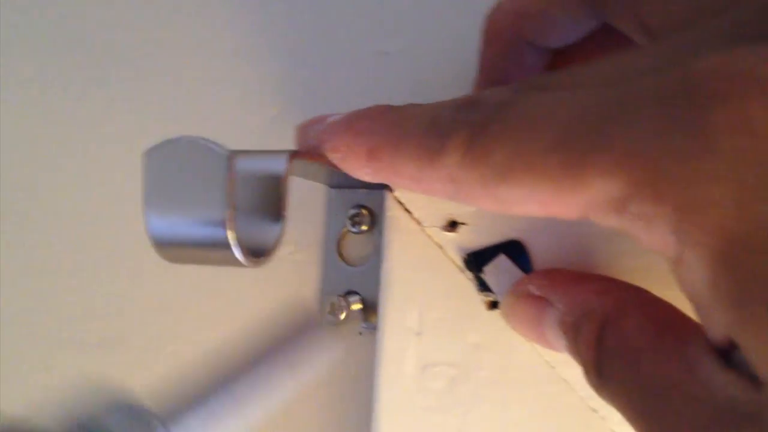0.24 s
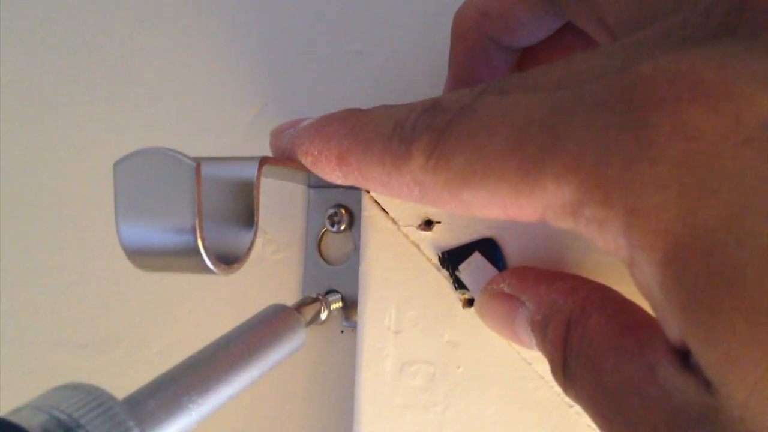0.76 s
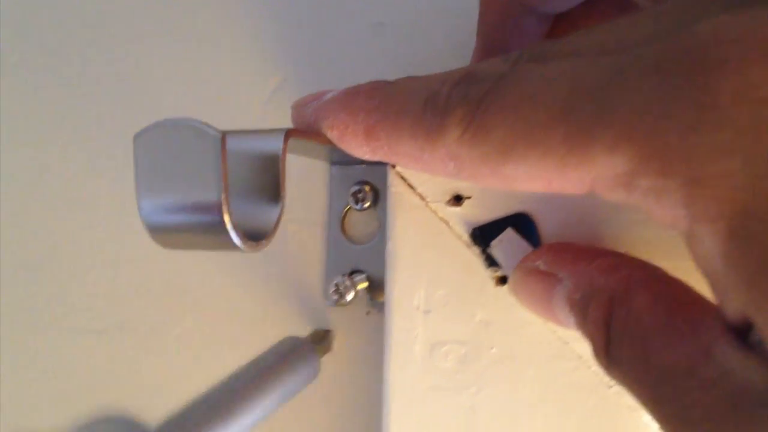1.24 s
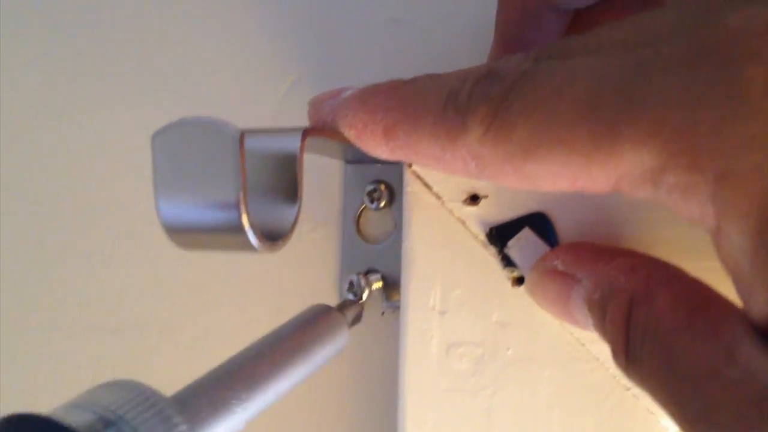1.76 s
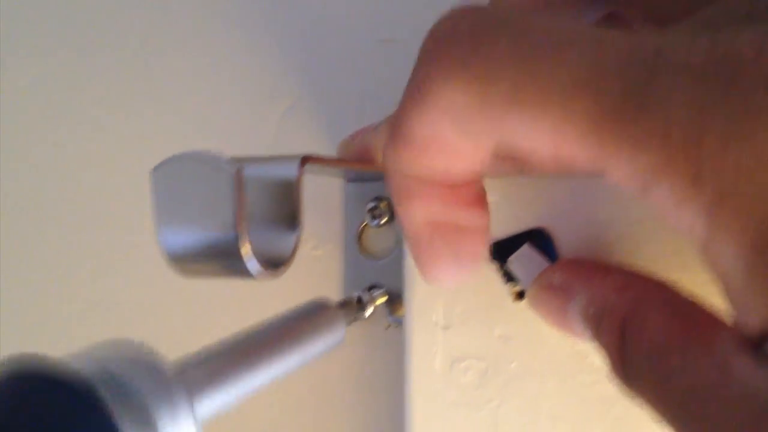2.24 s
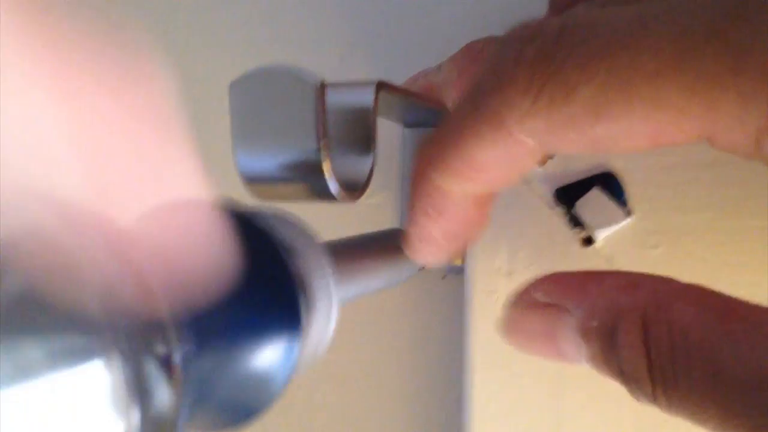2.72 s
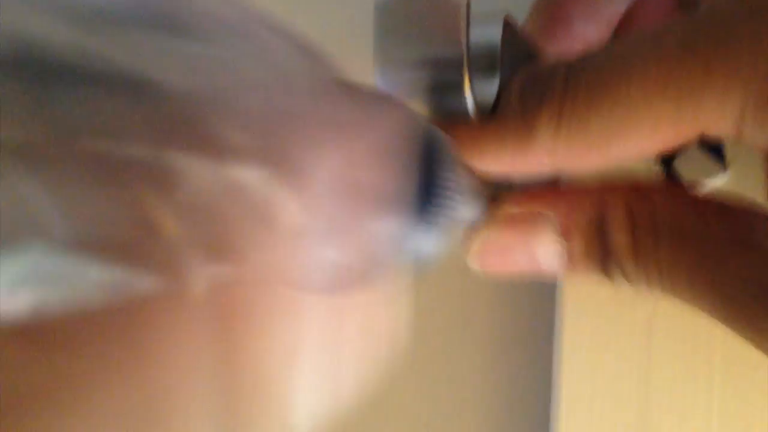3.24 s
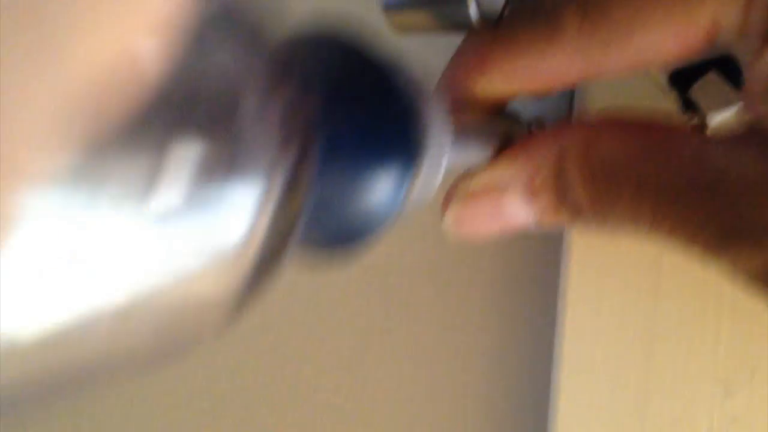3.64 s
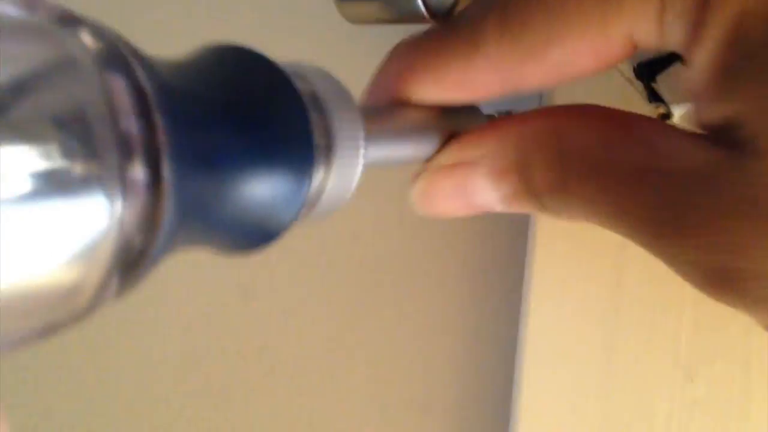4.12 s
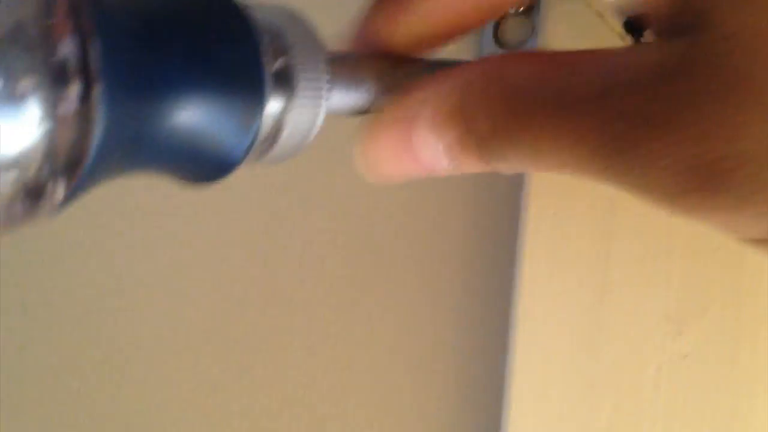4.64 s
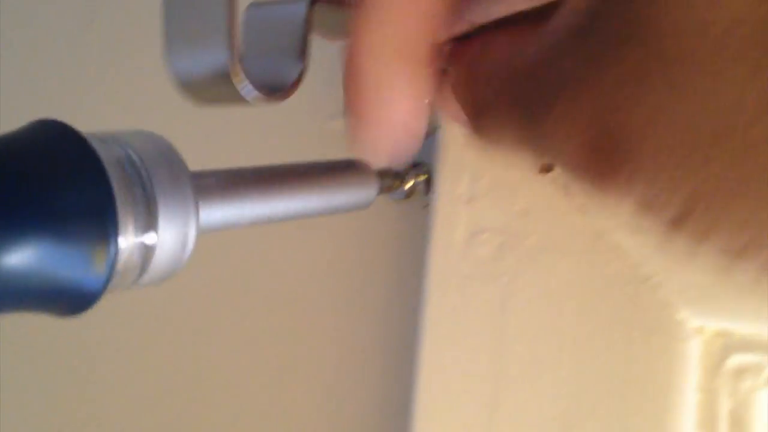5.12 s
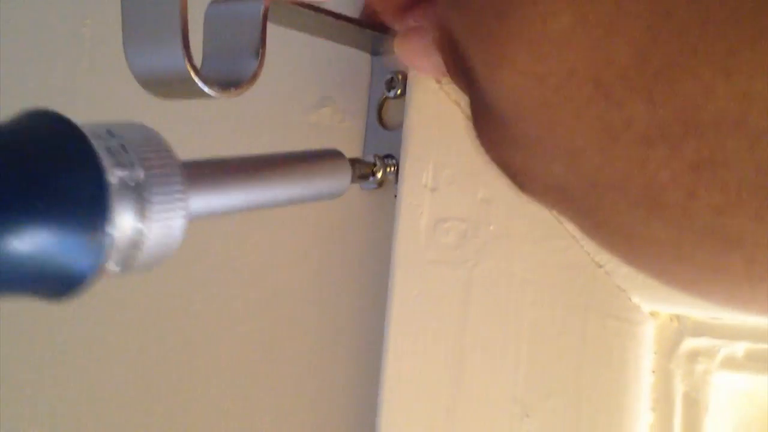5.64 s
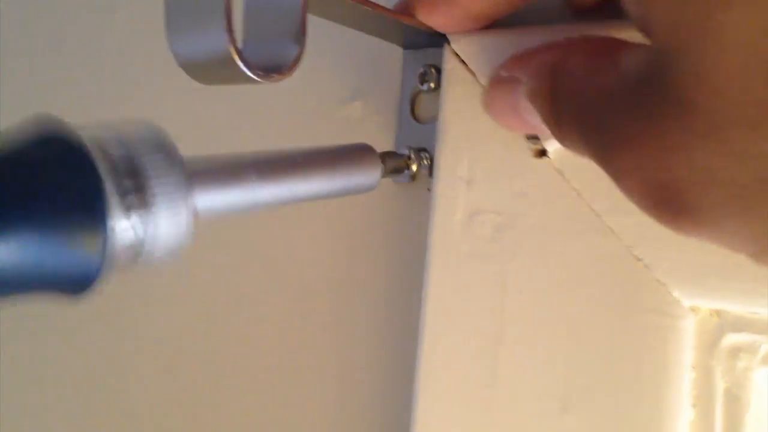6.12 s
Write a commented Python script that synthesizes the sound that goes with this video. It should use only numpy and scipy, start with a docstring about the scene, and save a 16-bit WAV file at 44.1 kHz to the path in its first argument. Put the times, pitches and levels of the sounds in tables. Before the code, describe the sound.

Close-up fumbling metal taps and a few sharp knocks give way to repeated crisp ratchet clicking in a small bare room.

```python
"""In a small bare room, a ratchet screwdriver drives a screw into a metal bracket on a wooden door frame, heard close up.
First the bit fumbles, taps and drags; later the pawl clicks over the ratchet teeth as the handle turns back.
Clicks, taps and knocks are short noisy blows that ring the tool, bracket or wood; drags and rubbing hands are lumpy
noise. The room answers with fading noise tails, over a faint hiss."""
import sys
import numpy as np
from scipy import signal
from scipy.fft import rfft, irfft, next_fast_len
from scipy.io import wavfile
from scipy.ndimage import map_coordinates

SR = 44100
rng = np.random.default_rng(int(sys.argv[2]) if len(sys.argv) > 2 else 0)


def unload_audio(sound):
    """Save the sound as a 16-bit wav file, at the path given as the first command line argument."""
    columns = np.transpose(np.atleast_2d(sound))
    # keep every value between -1 and 1, then stretch to whole-number steps
    steps = np.round(np.clip(columns, -1, 1) * 32767)
    wavfile.write(sys.argv[1], SR, steps.astype(np.int16))


N = 281358  # length in samples

# Hands sliding on wood and tool. Each row: time in seconds, rumble level in dB, rustle level in dB.
HAND_RUBS = [(0.0, -67.5, -72), (1.05, -73.5, -75), (1.22, -60, -62.5), (1.42, -77, -69),
             (1.78, -75.5, -97), (2.15, -63, -63), (2.42, -63, -65.5), (3.0, -61.5, -67.5),
             (3.16, -62, -62), (3.36, -67, -66), (4.42, -64, -65.5), (4.62, -63.5, -69), (5.26, -68, -67),
             (5.49, -57.5, -66.5), (5.86, -67, -61), (6.06, -60, -68), (6.2, -62, -57.5), (6.38, -67, -71)]
# Pushes into the frame. Each row: start in seconds, level of the middle modes in dB,
# low boom over them in dB, upper modes over them in dB.
FRAME_PUSHES = [(0.002, -45, 0, -22), (0.357, -52, -17, -0.5), (0.669, -41.5, -0.5, -10),
                (1.004, -48.0, -2, -8.5), (1.107, -47.5, -1.5, -5), (1.16, -55, -7, 7),
                (1.212, -20.5, -1.5, -5.5), (1.236, -31.0, 7, -7), (1.325, -50.5, 7, 7),
                (1.81, -50.5, -5, -7), (1.829, -49.5, 5.5, -6.0), (2.014, -42, 4, -5.5),
                (2.036, -46, 8.5, -15), (2.214, -49, 1, 4), (2.255, -34.5, -8, 2), (2.281, -41, 5.5, -14),
                (2.443, -49, -4, 3.0), (2.563, -29.5, 1, 2), (2.681, -43.5, 0.5, 5.5),
                (2.721, -48, -11, 11), (2.863, -46, -3, -0.5), (2.918, -37.5, -5, 1), (2.933, -41.5, 4, -5),
                (3.138, -39.5, 5.5, 10), (3.944, -50.5, 6.5, 4.5), (4.058, -48.5, 1, -1),
                (4.268, -52, 8, 4.5), (4.361, -47.5, 2.5, -1), (4.739, -61, 21, -2),
                (4.756, -57.5, 19, -6.5), (4.857, -36, -12, -6), (5.0, -41.5, 6, -6),
                (5.241, -33.5, -19, -10), (5.253, -33, -12.5, -2), (5.472, -36.0, -6.5, -5),
                (5.509, -41.0, -19, -10), (5.629, -20.5, -10, -13), (5.76, -40.5, -13, -3.5),
                (5.782, -47, 4, 1), (5.966, -27.5, -7.5, -26), (6.109, -29.5, -14, -6),
                (6.122, -25.5, -11, -11), (6.143, -30.5, -5.5, -5), (6.31, -28.0, -15, -6)]
# The bit touching screw and bracket. Each row: start in seconds, level of the lowest ring in dB,
# second ring over it in dB, treble over it in dB.
BIT_TAPS = [(0.2134, -43, -8.5, -3.5), (0.6703, -41, -6, 1), (0.719, -48, 0, -5),
            (1.0059, -43.5, -2.5, 3.5), (1.092, -45, -3, -8), (1.109, -48, 0.5, -13), (1.117, -54, 8, -4.5),
            (1.1515, -43, -10.5, -8), (1.1586, -43.5, -10.5, 5.5), (1.1703, -36, 7.5, -16.5),
            (1.213, -14, -3.5, -2), (1.2495, -19.5, -5.5, -3.5), (1.2788, -27.5, 4.5, 12),
            (1.29, -32.5, 0, 0), (1.3232, -40.5, -3, -4), (1.687, -44, -1, 6.5), (1.729, -49, -3, -10),
            (1.796, -46.5, -7, -1), (1.806, -44.5, -4.5, 3), (1.829, -46.5, -7, -2), (1.8532, -51.5, 0, -6),
            (2.0103, -43, -5, -13), (2.1243, -52, -14, -11), (2.1823, -57, 7, 10), (2.2009, -44, 4, 3),
            (2.214, -47, 1.5, 5.5), (2.257, -19.5, -7, -9), (2.421, -56, 6.5, -10.5),
            (2.4456, -45, -23, -18), (2.5445, -42, 5, -1.5), (2.563, -9, -3.5, -1), (2.681, -54, 7, 2),
            (2.701, -49, 12, -16), (2.7077, -44, 8, -12), (2.714, -48, -2.5, 0.5), (2.723, -30, 1.5, -19),
            (2.745, -48, 2, 1.5), (2.8616, -53.0, 1, -4), (2.8882, -34.5, -8, -14),
            (2.919, -43.5, -1, -7.5), (2.9898, -60.5, 20.5, 20), (3.0525, -46, -4, -5),
            (3.1389, -35, -14.5, -23), (3.72, -45, 1.5, -7), (4.269, -49.5, -14, -11.5),
            (4.789, -64, 6.0, 13.5), (4.8573, -41.5, -12, -25), (4.877, -44, -11, -5),
            (4.9317, -56, -2, -2), (4.9783, -40, 10.5, 8.5), (4.996, -39, -5, -5), (5.005, -46, -3, 5),
            (5.075, -63, 5.5, 6), (5.2436, -50.5, 0, -12), (5.4395, -39.5, -10, 2),
            (5.4688, -34.5, -13.5, -29), (5.514, -46, -4, -5.5), (5.979, -38, -4, -2),
            (6.1002, -41, -8.0, 1), (6.1105, -24, -12.0, -12), (6.122, -30, -6, -12),
            (6.1303, -29.5, -15.5, -9), (6.142, -30.5, -2, -10), (6.314, -37, -3.0, -0.5)]
# The bit dragging over metal and wood. Each row: start in seconds, length in seconds, level in dB.
BIT_DRAGS = [(.54, 0.14, -68), (1.069, .11, -57.5), (1.79, 0.088, -65), (2.162, 0.14, -61.5),
             (2.412, 0.069, -59), (2.516, 0.042, -52), (2.67, .09, -58), (2.847, 0.13, -55),
             (2.96, 0.14, -55), (3.775, 0.045, -57), (4.353, .03, -53.5), (5.382, 0.2, -56),
             (5.968, 0.057, -46), (6.064, 0.077, -45), (6.308, 0.042, -41.5)]
# Each tooth the pawl drops from. Each row: start in seconds, level of the lowest ring in dB,
# second ring over it in dB, treble over it in dB.
TOOTH_DROPS = [(3.17, -37, 8, 1.5), (3.1797, -22, 14.5, 8), (3.195, -21, 4, 7), (3.2183, -30.5, 3.5, 6.5),
               (3.2229, -25, 6.5, 9), (3.2787, -26, 3.5, 10), (3.2922, -24, -8, 7), (3.307, -25, 9.5, 13.0),
               (3.3311, -23.5, 0, 9.0), (3.5369, -17, 1.5, 3), (3.5528, -17.5, -0.5, 6),
               (3.565, -18, 1.5, 6.5), (3.5756, -15.5, 0, 3), (3.5872, -23.5, 5, 10.5),
               (3.8001, -18.5, 2, 0.5), (3.8117, -15, -10.5, 3.5), (3.825, -17, -1.5, 7),
               (3.8337, -16, -5.5, 1), (3.8439, -13.5, -1, 0.5), (3.8515, -19, 7, 7), (3.8624, -18, 5, 6),
               (4.0802, -15.5, 1.5, 1), (4.0976, -15.0, -3, 5.0), (4.1112, -18.5, 0.0, 2.5),
               (4.1335, -25.5, 6.5, 12.5), (4.3837, -24.5, 3.5, 10.5), (4.4025, -21, 3, 7.5),
               (4.428, -20.5, 0.5, 9.5), (4.4517, -21, -1.5, 10.5), (4.4657, -19.5, 2.5, 3.5),
               (4.4756, -18.5, -4.5, 8.5), (4.489, -21, 0.5, 6.5), (4.4977, -28, -9.5, -6.5),
               (4.514, -22, -3, 8), (5.2553, -32.5, 5.5, 6), (5.268, -24.5, 3.5, 13.5),
               (5.2793, -25.5, 2.5, 13.5), (5.2894, -25.5, 5, 13), (5.299, -31.5, 13.5, 16),
               (5.3081, -26, 3, 11.5), (5.3193, -22.0, -2, 3.5), (5.3361, -21.5, -12.5, 2.0),
               (5.3569, -30.5, 2, -4), (5.3697, -21, -7.0, 3.5), (5.6378, -39.5, -3, 4),
               (5.6502, -26.5, 0, 13.5), (5.6598, -23.5, 0.5, 14.5), (5.669, -24.5, 1, 13.5),
               (5.678, -20.5, 3.5, 11.5), (5.6881, -20.5, 3, 6.5), (5.7029, -27.5, -3, 12),
               (5.9941, -25.5, 0, 8.5), (6.005, -24, -8, 11.5), (6.0146, -23.0, 2.5, 11),
               (6.0249, -22, 1.5, 7), (6.035, -21.5, -7, 11.5), (6.05, -26.5, 5.5, 9.5),
               (6.3338, -23.5, 3, 11.5), (6.342, -21, -6, -3.5), (6.3522, -22.5, -4, 11),
               (6.3616, -20, -9, 9.5), (6.3681, -22.0, -3, 2.5), (6.3775, -28, -6, 3)]

# Ways the wood, bracket and driver ring, in groups from low to high.
# Each row in a group: pitch in Hz, width in Hz, level against the rest of its group in dB.
FRAME_MODES = [
    [(147.4, 23, -5), (192.3, 12, 3), (237, 15, -4)],
    [(330.5, 50, -1), (449, 47, -0.051), (549.5, 71, 0.74)],
    [(759, 120, -1.5), (976, 320, -3.5), (1194, 260, -5.5)],
]
BRACKET_MODES = [
    [(1500, 1300, -7.5), (1930, 400, 1.5), (2680, 684, 4.5), (3316, 500, 3)],
    [(4200, 680, 0)],
    [(6080, 410, 0.021), (8840, 720, 0.011)],
    [(11750, 2200, 0.016), (13500, 530, 0.017)],
]
DRIVER_MODES = [
    [(1868, 2400, -7), (2867, 770, 8)],
    [(4460, 1050, 0)],
    [(6580, 1110, -3), (7640, 1200, -1.5), (9020, 1930, -3.5)],
    [(12240, 1400, 8.5), (15150, 860, 14)],
]
# How the treble divides between the two upper mode groups: one dB offset for each group.
TAP_TREBLE_DB = [-4, -8]
PAWL_TREBLE_DB = [-2, -2]

# Noise colours: rumble and rustle of the hands, then quiet room and microphone hiss.
# Each row: frequency in Hz, relative strength in dB per Hz.
RUMBLE_COLOUR = [(24, -45.5), (40, -25), (157, -11), (212, -7.5), (439, -11.5), (543, -13), (692, -14.5),
                 (1500, -23.5), (1950, -52), (3300, -120)]
RUSTLE_COLOUR = [(700, -36), (1500, 0.5), (2800, 0), (4400, -1.5), (8000, -5.5), (15000, -8.5)]
AIR_COLOUR = [(18, -58.5), (30, -23), (177, -6.5), (808, -12), (1020, -8.5), (1170, -17), (1470, -9),
              (6210, -14), (6890, -12), (9680, -18.5), (15500, -12)]
# How long the room rings. Each row: frequency in Hz, seconds to fall by 60 dB.
ROOM_DECAY = [(150, 0.37), (700, 0.31), (2000, 0.21), (5000, 0.27), (13000, 0.23)]
# What the microphone passes. Each row: frequency in Hz, gain in dB.
MICROPHONE_GAIN = [(30, -12.5), (100, -0.5), (200, -0.5), (15000, -5), (15500, -28), (16400, -33)]

AIR_DB = -68.5
TOP_HZ = 16520  # nothing is kept from here up
REBOUND_S, REBOUND_DB = 0.006, -13  # delay and level of a tap's rebound
FIDGETS_PER_S, FIDGET_DB = 10, -2  # faint chance contacts; lowest level over the rustle of the hands
SCATTER_DB = 2  # no two contacts divide their treble alike
SCRAPE_EDGE = 0.52  # under 1, a drag starts and stops more abruptly than a sine arch
# The pawl scrapes the crest of the tooth before it drops: typical head start, level and length.
LEAD_S, LEAD_DB, LEAD_MS = 0.0044, -10, 6.3
LEAD_FADES = 0.43  # dB of scrape lost per dB of treble: crisp drops come clean off the tooth
# Chatter length of a drop with 0 dB of treble, and how far it shrinks (as dB) per dB of treble.
CHATTER_MS, CRISPER_DB = 2.88, -0.05


def amp(db):
    """Turn dB into a gain."""
    return 10 ** (np.asarray(db) / 20)


def unit(x):
    """Scale a sound to an average (rms) strength of 1."""
    return x / np.sqrt(np.mean(x ** 2) + 1e-20)


def along(points, hz):
    """Read a curve of (Hz, value) points, joined by lines on a log frequency axis."""
    f, v = np.transpose(points)
    return np.interp(np.log(hz + 1), np.log(f + 1), v)


def filtered(x, response):
    """Change the strength of each frequency in x by the given response."""
    padded = next_fast_len(N + SR // 2)
    spectrum = rfft(x, padded) * response(np.fft.rfftfreq(padded, 1 / SR))
    return irfft(spectrum, padded)[..., :N]


def noise(colour):
    """Make steady noise of the given colour, with rms 1."""
    return unit(filtered(rng.standard_normal(N), lambda hz: amp(along(colour, hz))))


def wobble(rate):
    """Draw a smooth random curve through `rate` chance points a second."""
    points = rng.standard_normal(int(N * rate / SR) + 4)
    return map_coordinates(points, [np.arange(N) * rate / SR])


def grouped(db, second_db, treble_db, split_db):
    """Give a level to each of four mode groups; chance tips the treble one way or the other."""
    tip_db = SCATTER_DB * rng.standard_normal(len(db))
    third_db = db + treble_db + split_db[0] + tip_db
    fourth_db = db + treble_db + split_db[1] - tip_db
    return [db, db + second_db, third_db, fourth_db]


def struck(times, levels_db, lasting_ms, body, rise_ms, linger_db, size):
    """Ring a body with chatters of tiny impacts that stop short and linger faintly.

    Levels count energy over 1 ms, per mode group. Two rows come back: the sound heard directly,
    and its mean over all directions, sent to the walls."""
    ms = np.arange(size) * 1000 / SR
    f = np.fft.rfftfreq(2 * size, 1 / SR)
    age = ms / lasting_ms[:, None]
    shape = (1 - np.exp(-ms / rise_ms)) * (np.exp(-age ** 2) + amp(linger_db) * np.exp(-age / 2.5))
    direct = spread = 0
    for db, modes in zip(levels_db, body):
        response = 0
        for k, (centre, width, gain_db) in enumerate(modes):
            mode = 1j * f * width / (centre ** 2 - f ** 2 + 1j * f * width)
            response = response + (-1) ** k * amp(gain_db) * mode  # neighbours have opposite signs
        chatter = shape * rng.standard_normal(shape.shape)
        ring = irfft(rfft(chatter, 2 * size) * response)[:, :size]
        clean = irfft(response)[:size]  # the ring of one single impact
        strength = amp(db)[:, None] * np.sqrt(SR / 1000)
        sign = rng.choice([-1, 1], (len(times), 1))
        direct = direct + strength * ring / np.linalg.norm(ring, axis=1, keepdims=True)
        spread = spread + strength * clean / np.linalg.norm(clean) * sign
    at = np.round(times * SR).astype(int)[:, None] + np.arange(size)
    return np.array([np.bincount(at.ravel(), blows.ravel(), N)[:N] for blows in (direct, spread)])


def hands():
    """Skin sticks and slips, so the rub comes in lumps and grains."""
    s, rumble_db, rustle_db = np.transpose(HAND_RUBS)
    t = np.arange(N) / SR
    lumps = amp(2.9 * wobble(25))
    rumble = amp(np.interp(t, s, rumble_db)) * unit(lumps * noise(RUMBLE_COLOUR))
    grains = amp(0.98 * wobble(25) + 3.8 * wobble(300))
    rustle = amp(np.interp(t, s, rustle_db)) * unit(grains * noise(RUSTLE_COLOUR))
    return rumble + rustle


def air():
    """Quiet room and microphone hiss are one steady coloured noise."""
    return amp(AIR_DB) * noise(AIR_COLOUR)


def knocks():
    """Softer pushes set the wood booming."""
    s, db, boom_db, upper_db = np.transpose(FRAME_PUSHES)
    levels_db = [db + boom_db, db, db + upper_db]
    wood = struck(s, levels_db, np.full(len(s), 1.6), FRAME_MODES, rise_ms=0.25, linger_db=-8.5, size=4096)
    return wood * amp([[0], [-7]])  # direct, to the walls


def taps():
    """Short hard contacts of the bit, each with a rebound, among faint ones that follow the hands."""
    s, db, second_db, treble_db = np.transpose(BIT_TAPS)
    when, size, ring, tone = rng.random((round(FIDGETS_PER_S * N / SR), 4)).T
    when = when * N / SR
    hand_s, _, rustle_db = np.transpose(HAND_RUBS)
    faint_db = np.interp(when, hand_s, rustle_db) + FIDGET_DB + 9 * size
    # Each list holds the taps, then their rebounds, then the faint contacts.
    s = np.r_[s, s + REBOUND_S, when]
    db = np.r_[db, db + REBOUND_DB, faint_db]
    second_db = np.r_[second_db, second_db - 5, 5 - 14 * ring]
    treble_db = np.r_[treble_db, treble_db - 4, 4 - 14 * tone]
    levels_db = grouped(db, second_db, treble_db, TAP_TREBLE_DB)
    metal = struck(s, levels_db, np.full(len(s), 1.5), BRACKET_MODES, rise_ms=0.04, linger_db=-2.5, size=1024)
    return metal * amp([[0], [-13]])


def scrapes():
    """Each drag of the bit swells and fades, gritty, and a little of it reaches the walls."""
    t = np.arange(N) / SR
    swell = 0
    for s, length, db in BIT_DRAGS:
        arch = np.abs(np.sin(np.pi * np.clip((t - s) / length, 0, 1)))
        swell = swell + amp(db) * arch ** SCRAPE_EDGE
    grit = unit(amp(2.5 * wobble(72) + 5.0 * wobble(350)) * noise(RUSTLE_COLOUR))
    return swell * grit * amp([[0], [-9]])


def ratchet():
    """The pawl scrapes, snaps off each tooth and chatters; a little of the blow reaches the wood."""
    s, db, second_db, treble_db = np.transpose(TOOTH_DROPS)
    time_chance, level_chance = rng.standard_normal((len(s), 2)).T
    lead_s = s - LEAD_S * (1 + 0.12 * time_chance)
    lead_db = db + LEAD_DB - LEAD_FADES * treble_db + 3 * level_chance
    drop_ms = CHATTER_MS * amp(CRISPER_DB * treble_db)
    # Each list holds the drops, then the scrapes that lead into them.
    chatter_ms = np.r_[drop_ms, np.full(len(s), LEAD_MS)]
    s, db = np.r_[s, lead_s], np.r_[db, lead_db]
    second_db, treble_db = np.tile(second_db, 2), np.r_[treble_db, treble_db - 4]
    levels_db = grouped(db, second_db, treble_db, PAWL_TREBLE_DB)
    steel = struck(s, levels_db, chatter_ms, DRIVER_MODES, rise_ms=0.13, linger_db=-16.5, size=1024)
    wood_db = [db - 30.0, db - 21, db - 17.5]
    wood = struck(s, wood_db, chatter_ms, FRAME_MODES, rise_ms=0.29, linger_db=-13.5, size=2048)
    return steel * amp([[0], [-11]]) + wood * amp([[0], [-6]])


def room(x, count=12):
    """Each frequency dies at its own speed; the tool moves, so each stretch of time gets a new tail."""
    out, size = np.zeros(N + 2 * SR), N // count + 1
    for k in range(count):
        hz, t, z = signal.stft(rng.standard_normal(SR * 3 // 4), SR, nperseg=256)
        fading = amp(-60 * t / along(ROOM_DECAY, hz)[:, None])
        tail = signal.istft(z * fading, SR, nperseg=256)[1]
        tail = tail * (1 - np.exp(-np.arange(len(tail)) / SR / 0.00051))  # the first walls are some way off
        wet = signal.fftconvolve(x[k * size:(k + 1) * size], tail / np.linalg.norm(tail))
        out[k * size:][:len(wet)] += wet
    return out[:N]


def scene():
    """Tool and wood sound directly and in the room, over hands and air."""
    direct, to_walls = knocks() + taps() + scrapes() + ratchet()
    return (direct + room(to_walls) + hands() + air())[None]


def record(dry):
    """The microphone loses the lowest bass, dulls the top and keeps nothing above the band limit."""
    return filtered(dry, lambda hz: amp(along(MICROPHONE_GAIN, hz)) * (hz < TOP_HZ))


dry = scene()
out = record(dry)
unload_audio(out)
```